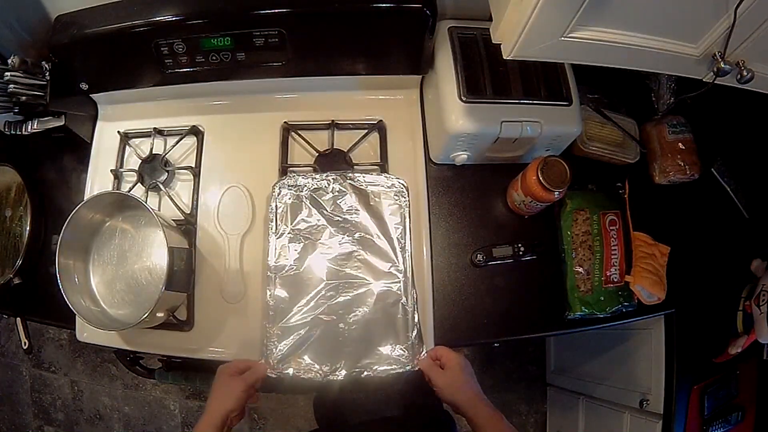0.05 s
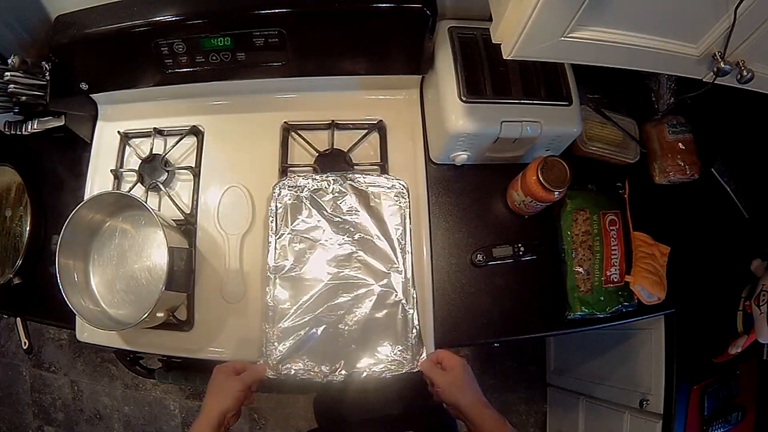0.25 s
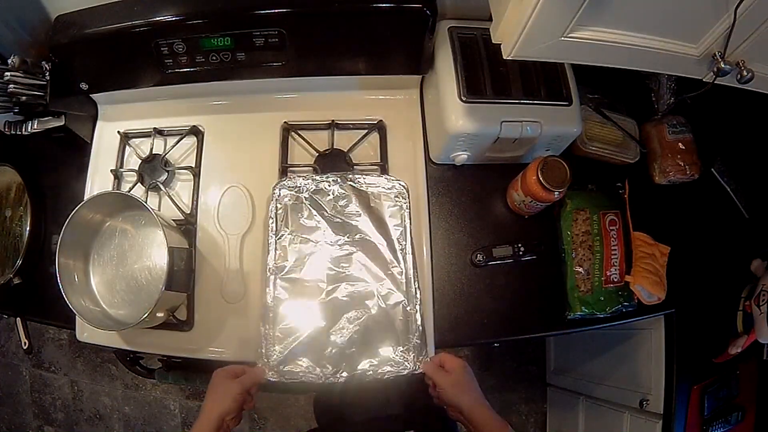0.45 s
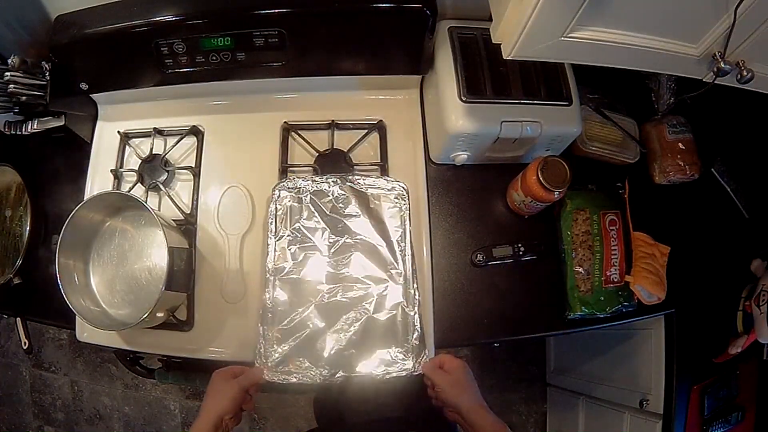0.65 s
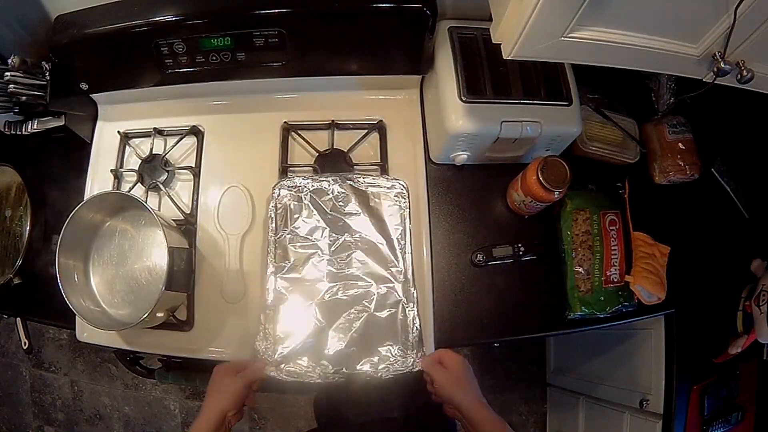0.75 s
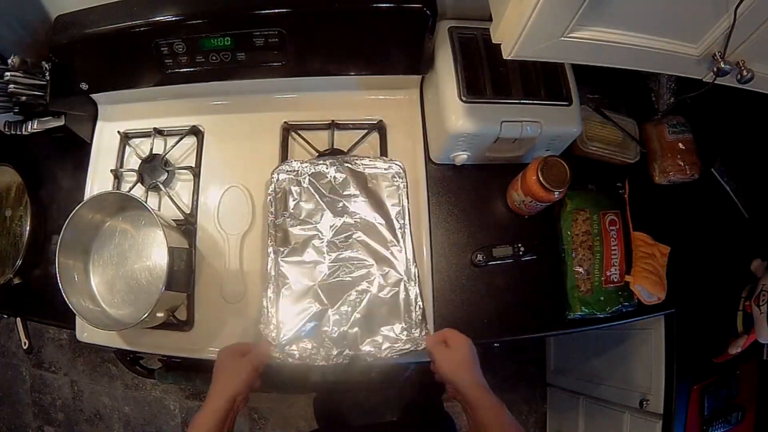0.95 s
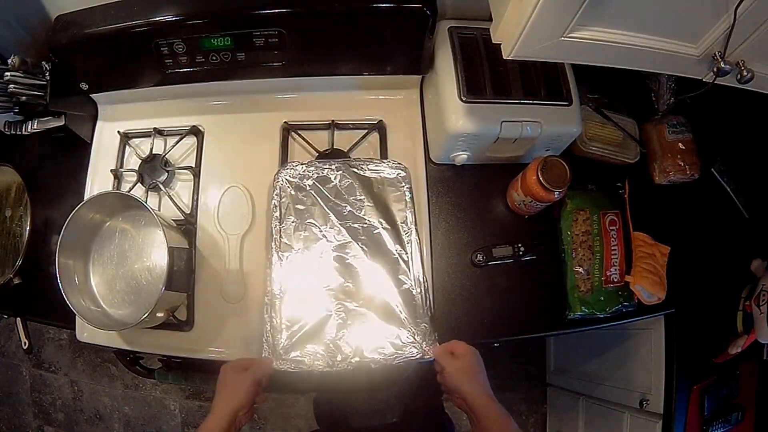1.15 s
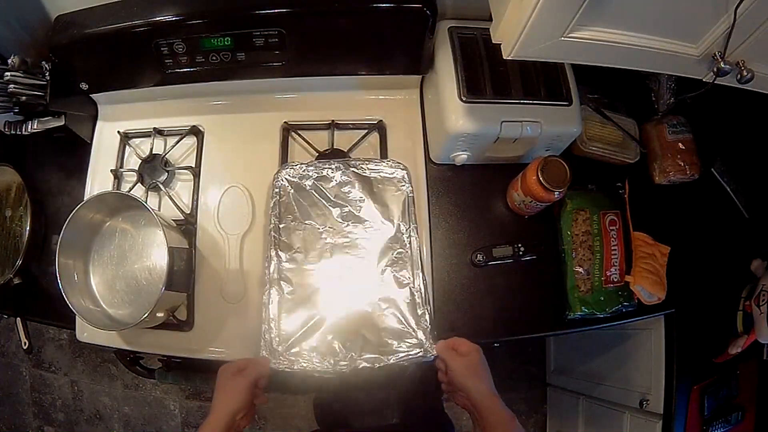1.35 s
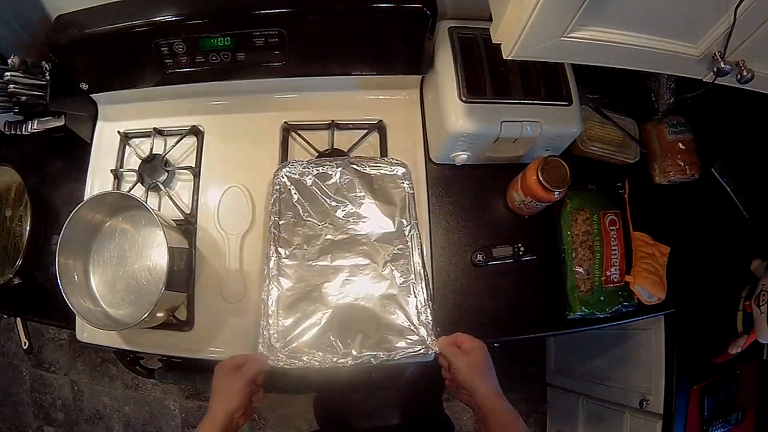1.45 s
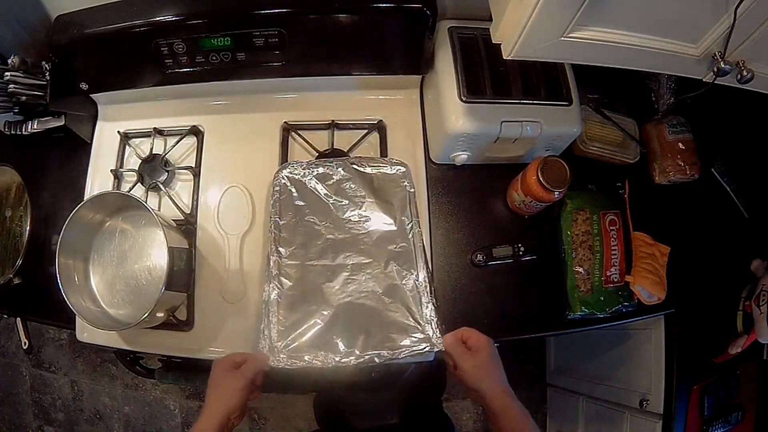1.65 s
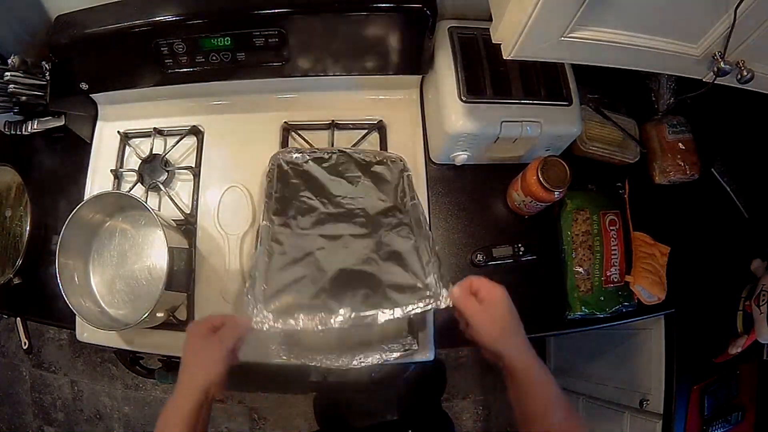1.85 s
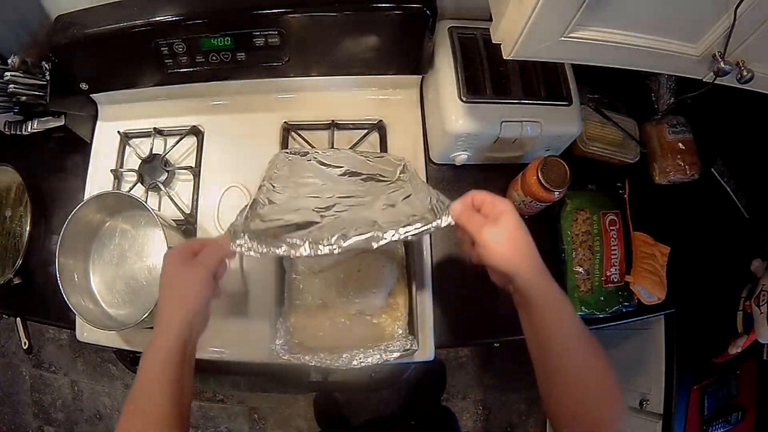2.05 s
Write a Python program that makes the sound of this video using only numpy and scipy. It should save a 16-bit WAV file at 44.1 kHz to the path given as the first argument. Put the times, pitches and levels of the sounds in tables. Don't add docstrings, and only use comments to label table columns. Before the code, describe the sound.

Aluminium foil crackles loudly as it is peeled off a baking pan. Dense crinkles and sharp snaps run from 0 to 0.6 s, then looser bursts until 0.9. A hard bright crackle hits near 1.03 s, fading into sparse, subdued rustling and near quiet by 1.6. Crackling swells again from 1.8 s. Soft pan knocks, a short room answer and low fan hum; close microphone with shifting automatic gain.

```python
import sys
import numpy as np
from scipy import signal
from scipy.fft import rfft, irfft, next_fast_len
from scipy.io import wavfile
from scipy.ndimage import uniform_filter1d

SR = 44100
rng = np.random.default_rng(int(sys.argv[2]) if len(sys.argv) > 2 else 0)


def unload_audio(sound):
    columns = np.transpose(np.atleast_2d(sound))
    steps = np.round(np.clip(columns, -1, 1) * 32767)
    wavfile.write(sys.argv[1], SR, steps.astype(np.int16))


def rack_gain(trim_db):
    fader = np.asarray(trim_db, float)
    return 10 ** (fader / 20)


N = 92742

# time in seconds, gain in dB.
CAMERA_GAIN = [(0, 4.5), (.45, 3), (.6, -3), (.75, 2), (1.02, 3), (1.035, -7.5), (1.2, -9), (1.5, -10),
               (1.62, -3), (1.69, -3), (1.77, 1.5), (2.1, 4)]


def unit(x):
    return x / np.sqrt(np.mean(x ** 2) + 1e-20)


def along(points, hz):
    f, v = np.transpose(points)
    return np.interp(np.log(hz + 1), np.log(f + 1), v)


def curve(rows):
    return np.interp(np.arange(N) / SR, *np.transpose(rows))


def filtered(x, response):
    m = next_fast_len(x.shape[-1] + 8192)
    spectrum = rfft(x, m) * response(np.fft.rfftfreq(m, 1 / SR))
    return irfft(spectrum, m)[..., :x.shape[-1]]


def resonance(f, hz, width_hz):
    return 1j * f * width_hz / (hz * hz - f * f + 1j * f * width_hz + 1e-9)


def octaves(hz):
    return np.log2((hz + 900) / 8900)


def tilted(x, tilt_db):
    return filtered(x, lambda hz: rack_gain(tilt_db * octaves(hz)))


def smooth(shape, size):
    return unit(uniform_filter1d(rng.standard_normal(shape), size=size, axis=-1))


def creases():
    # start in seconds, peak level in dB after the camera gain,
    # rise in ms, t60 in seconds, tilt in dB per octave.
    buckles = [(.0004, -17.5, 0.47, 0.14, -3.5), (0.01, -12, 6.2, .045, 1),
               (0.055, -14, 2.8, 0.091, -2.5), (.070, -14.5, 2, 0.039, 0),
               (0.095, -12, 2.6, 0.069, -1), (0.105, -13, 3.5, 0.089, -0.5),
               (.121, -9, 3.5, 0.085, 1.5), (.135, -13.5, 1.3, 0.11, -3.5),
               (0.15, -12.5, 2.5, 0.17, 1.5), (0.172, -8.5, 2.5, 0.12, -0.5),
               (0.193, -9, 4.3, 0.02, 1.5), (.2184, -17, 1, 0.02, 2), (0.2226, -9, 0.41, 0.053, 1.5),
               (0.2667, -15, 1, 0.057, -2), (0.2941, -17, 1, 0.045, 10), (0.3043, -15, 1, 0.057, 1),
               (0.3071, -10.5, 1.1, 0.052, 1.5), (.311, -9.5, 3, 0.051, 0),
               (0.324, -10.5, 3, 0.034, 1), (.338, -28.5, 9.2, .1, -8), (0.359, -12, 2.4, 0.22, -3.5),
               (0.386, -12.5, 16.4, 0.12, -2.5), (0.403, -8, 2.8, 0.032, 1),
                 (.429, -13.5, 2.4, 0.13, -4.5), (0.44, -5.5, 11.3, 0.11, 5),
                 (0.465, -9.5, 3.4, 0.079, -2.5), (.483, -6.5, 1.4, 0.087, -5), (.490, -9, 2.5, 0.15, 0),
                 (0.507, -10, 16, 0.16, 0), (.538, -6, 9.4, 0.09, 0.5), (0.572, -8, 2.9, 0.026, -0.5),
                 (0.586, -14, 3.3, 0.047, -2.5), (.598, -23, 2.6, 0.11, 2), (.6166, -23.5, 1.7, 0.12, -5),
                 (0.636, -18, 1.8, 0.074, -4), (.659, -21.5, 3.3, 0.13, -5.5),
                 (0.678, -19.5, 7.3, 0.11, -6.5), (0.689, -12.5, 10.6, 0.082, -3.5),
                 (.744, -17.5, 1.4, 0.23, -5), (0.753, -17, 1.3, 0.043, 6), (.769, -11, 6.4, 0.15, -3),
                 (0.799, -20, 5, 0.16, -5.5), (.820, -9.5, 13, 0.09, -1.1), (0.846, -17, 5.5, 0.054, 3),
                 (0.909, -28, 3.6, 0.29, -5),
               (0.926, -30, 59, 0.12, -10), (0.9994, -14.5, 0.79, 0.4, -3.5),
                 (1.0141, -12, 1.4, 0.34, 2.5), (1.019, -2, 1.7, 0.12, 2.5), (1.038, -5.5, 9.2, 0.1, 9),
                 (1.058, -9.5, 5.1, 0.11, 0), (1.069, -14, 1.5, 0.21, 1), (1.125, -21, 18, 0.28, -0.5),
                 (1.159, -17, 21, 0.061, 1.5), (1.219, -26, 4, 0.19, -3.5), (1.230, -20.5, 4.6, 0.038, 2),
                 (1.305, -20, 20, 0.43, -1), (1.339, -15.5, 19.6, 0.18, -0.5),
                 (1.373, -14.5, 6.7, 0.095, 3), (1.395, -24, 3, 0.2, -5), (1.436, -26, 16, 0.3, -2.5),
                 (1.498, -26.5, 22, 0.1, -0.5), (1.576, -37.5, 3, 0.036, -7), (1.6, -25, 3, 0.072, -2),
                 (1.6455, -28, 4.9, 0.071, -3), (1.652, -25.5, 2, 0.052, -5), (1.661, -37, 2, 0.042, -9),
               (1.682, -39, 8.7, 0.11, -5), (1.697, -30, 9.6, .1, -5), (1.714, -24.5, 5.8, 0.14, -3.5),
                  (1.733, -17.5, 3.7, 0.22, -5.5), (1.753, -20.5, 3.7, 0.35, -4.5),
                  (1.780, -18, 26, 0.38, -1.5), (1.814, -14, 20, 0.12, -3.5),
                  (1.839, -5.5, 3.8, 0.099, 1.5), (1.868, -8, 5.5, 0.039, -1),
                  (1.9082, -12.5, 1.6, 0.088, 1), (1.917, -19, 2.7, 0.12, -3), (1.958, -12, 3.9, 0.14, -1),
                  (1.991, -16.5, 1.3, 0.069, 0), (2, -12.5, 2.1, 0.13, -1.5),
                  (2.019, -16.5, 12, 0.15, -4.5), (2.032, -11.5, 7.1, 0.048, 3.5),
                  (2.069, -16, 2.2, 0.069, -1.5)]
    crest_db, spiky_db, ripple_db = -7.5, 1.1, 1.5
    small_db, narrow_db = -13, 0.02
    lead = 64

    folds = buckles
    s, db, rise_ms, t60, tilt = np.transpose(folds)[..., None]
    t = np.arange(6144) / SR
    shape = (len(s), len(t))
    swarm = unit(rng.standard_normal(shape) * rack_gain(spiky_db * smooth(shape, size=10)))
    attack = np.sin(np.pi / 2 * np.clip(1000 * t / np.clip(rise_ms, .3, 90), 0, 1)) ** 2
    decay_db = -60 * np.maximum(t - rise_ms / 1000, 0) / np.clip(t60, .015, .3)
    swarm = swarm * attack * rack_gain(db + crest_db + decay_db)

    hz = np.fft.rfftfreq(len(t), 1 / SR)
    narrowing = narrow_db * np.clip(small_db - db, 0, 15) * np.log2((hz + 900) / 7000) ** 2
    ripple = ripple_db * smooth((len(s), len(hz)), size=160)
    colour_db = tilt * octaves(hz) - narrowing + ripple
    swarm = irfft(rfft(np.roll(swarm, lead, 1)) * rack_gain(colour_db), len(t))
    at = np.round(s * SR).astype(int) + np.arange(len(t))
    return np.bincount(at.ravel(), swarm.ravel(), N + 8192)[lead:N + lead]


def cracks():
    # start in seconds, peak level in dB after the camera gain.
    snaps = [(0.0141, -17), (0.0599, -13), (0.0719, -12), (0.0965, -8), (0.1282, -2), (0.1416, -11),
             (0.1769, -6), (0.1982, -4), (0.2237, -12), (0.2689, -15), (0.295, -6), (0.3135, -16),
             (0.327, -8), (0.3514, -16), (0.363, -8), (0.397, -3), (0.4079, -6), (0.4339, -14),
             (0.4494, -8), (0.4694, -6), (0.484, -10), (0.4925, -5), (0.5183, -9), (0.5444, 3),
             (0.5487, -7), (0.5755, -6), (0.5883, -13), (0.6987, -7), (0.7458, -13), (0.7551, -8),
             (0.7749, -3), (0.785, -12), (0.8032, -13), (0.8296, -14), (0.8601, -15), (1.0034, -8),
             (1.0071, -11), (1.0273, -8), (1.0452, 2), (1.0496, -6), (1.0563, -9), (1.0635, -9),
             (1.1383, -20), (1.237, -21), (1.4089, -26), (1.8416, -3), (1.8721, -8), (1.911, -6),
             (1.9662, -14), (1.9913, -7), (2.0015, -5), (2.0379, -12)]
    level_db, tilt_db, t60_s = -7, 3, .003
    s, db = np.transpose(snaps)[..., None]
    k = np.arange(384)
    signs = np.sign(rng.standard_normal((len(s), len(k))))
    click = signs * rack_gain(db + level_db - 60 * k / SR / t60_s)
    at = np.round(s * SR).astype(int) + k
    return tilted(np.bincount(at.ravel(), click.ravel(), N + len(k))[:N], tilt_db)


def rustle():
    # time in seconds, rustle level in dB after the camera gain.
    pull = [(0, -58), (.26, -47), (.35, -24.5), (.55, -39), (.62, -40), (.8, -30), (.9, -43), (.99, -40.5),
            (1.1, -28), (1.2, -45.5), (1.28, -47), (1.42, -30.5), (1.57, -57), (1.7, -48), (1.8, -25),
            (2.1, -43)]
    ticks_per_s, tick_db, tick_t60_s = 130, 1, 0.08
    chance, size = rng.random((2, N))
    ticks = (chance < ticks_per_s / SR) * rack_gain(tick_db) * size
    life = rack_gain(-60 * np.arange(1024) / SR / tick_t60_s)
    density = 1 + signal.fftconvolve(ticks, life)[:N]
    hiss = unit(density * rng.standard_normal(N))
    return tilted(rack_gain(curve(pull)) * hiss, -1.5)


def foil():
    # frequency in Hz, level in dB per Hz.
    sheet = [(240, -35), (400, -29.5), (705, -21), (860, -28), (1220, -21), (1610, -18), (5000, -6),
             (8700, -4.5), (15600, -8)]
    # frequency in Hz, width in Hz, level in dB.
    pan_modes = [(719, 120, -3.5), (957, 26, 5.5), (1178, 110, 0), (1856, 37, 3.5), (2704, 210, -4)]

    def colour(hz):
        ringing = sum(rack_gain(db) * resonance(hz, centre, width) for centre, width, db in pan_modes)
        return rack_gain(along(sheet, hz)) * (1 + ringing)

    scale = np.std(filtered(rng.standard_normal(N), colour))
    crackle = creases() + cracks() + rustle()
    return filtered(crackle / rack_gain(curve(CAMERA_GAIN)), colour) / scale


def bumps():
    # start in seconds, level in dB after the camera gain, pitch in Hz, t60 in seconds.
    knocks = [(.19, -35, 694, 0.084), (.485, -24.5, 1020, 0.042), (0.493, -25, 1243, 0.048),
              (0.695, -27, 514, 0.041), (.69, -30, 707, 0.086), (.75, -33, 670, 0.062),
              (.745, -37.5, 1185, .15), (.805, -40, 600, 0.076), (.82, -35, 1853, 0.13),
              (.938, -42.5, 956, 0.26), (.997, -40, 1210, .035), (1.016, -27, 740, 0.05),
              (1.043, -33, 683, 0.044), (0.789, -34, 1420, 0.16), (1.037, -22, 1210, 0.03),
              (1.75, -30.5, 740, 0.043)]
    out, t = np.zeros(N + SR), np.arange(SR // 4) / SR
    for s, db, hz, t60 in knocks:
        soft_onset = 1 - np.exp(-t / .005)
        out[round(s * SR):][:len(t)] += rack_gain(db - 60 * t / t60) * soft_onset * np.sin(2 * np.pi * hz * t)
    return 1.36 * out[:N] / rack_gain(curve(CAMERA_GAIN))


def room(x):
    # frequency in Hz, t60 in seconds.
    decay = [(300, 0.39), (3000, 0.22), (14000, 0.056)]
    step = SR // 10
    parts = np.pad(x, (200, step - (N + 200) % step)).reshape(-1, step)
    hz, t, z = signal.stft(rng.standard_normal((len(parts), 4 * step)), SR, nperseg=256)
    tails = signal.istft(z * rack_gain(-60 * t / along(decay, hz)[:, None]), SR, nperseg=256)[1]
    tails = tails / np.linalg.norm(tails, axis=1, keepdims=True)
    wet = signal.fftconvolve(parts, tails, axes=1)
    at = step * np.arange(len(parts))[:, None] + np.arange(wet.shape[1])
    return np.bincount(at.ravel(), wet.ravel())[:N]


def kitchen():
    # frequency in Hz, level in dB per Hz.
    air_colour = [(15, -37), (25, 10), (126, 1.5), (553, -17), (947, -15.5), (1050, -17.5), (1860, -13.5),
                  (8840, -22), (15600, -98)]
    flutter_hz, flutter_width_hz, flutter_db = 106, 14, -48
    line_hz, line_db, overtone_db = 120, -41, -22
    blade_hz, blade_db = 102.9, -46
    thrum_hz, thrum_db = 43.5, -50
    in_step_s, air_db = .032, -40

    flutter = unit(filtered(rng.standard_normal(N),
                            lambda f: resonance(f, flutter_hz, flutter_width_hz) ** 2))
    turn = 2 * np.pi * (np.arange(N) / SR - in_step_s)
    overtones = np.sin(2 * line_hz * turn) + np.sin(3 * line_hz * turn) / 2
    line = np.sin(line_hz * turn) + rack_gain(overtone_db) * overtones
    blade = rack_gain(blade_db) * np.sin(blade_hz * turn)
    thrum = rack_gain(thrum_db) * np.sin(thrum_hz * turn)
    tones = rack_gain(line_db) * line + blade + thrum
    air = unit(filtered(rng.standard_normal(N), lambda hz: rack_gain(along(air_colour, hz))))
    return rack_gain(flutter_db) * flutter + np.sqrt(2) * tones + rack_gain(air_db) * air


def scene():
    room_db = -9
    near = foil() + bumps()
    return (near + rack_gain(room_db) * room(near) + kitchen())[None]


def microphone(hz):
    rumble_cut_hz, shelf_hz, shelf_db = 29, 11160, -7.5
    port_hz, port_width_hz, port_db = 8930, 1600, -4
    low_cut = hz ** 4 / (hz ** 4 + rumble_cut_hz ** 4)
    port = 1 + rack_gain(port_db) * resonance(hz, port_hz, port_width_hz)
    top = rack_gain(shelf_db / (1 + (shelf_hz / (hz + 1)) ** 24))
    return low_cut * port * top


def low_pass(x):
    return signal.sosfilt(signal.butter(12, 15710, fs=SR, output="sos"), x)


def record(dry):
    ceiling, top_hz = .62, 15800
    x = filtered(dry, microphone) * rack_gain(curve(CAMERA_GAIN))
    x = x / (1 + np.abs(x / ceiling) ** 4) ** .25
    x = filtered(x, lambda hz: hz < top_hz)
    return low_pass(x)


dry = scene()
out = record(dry)
unload_audio(out)
```